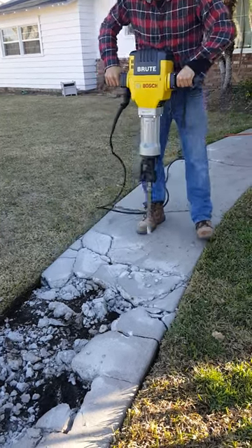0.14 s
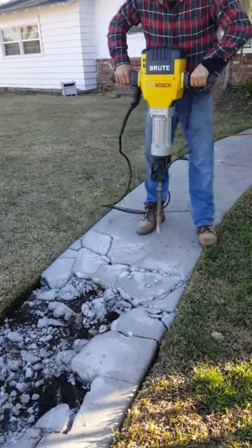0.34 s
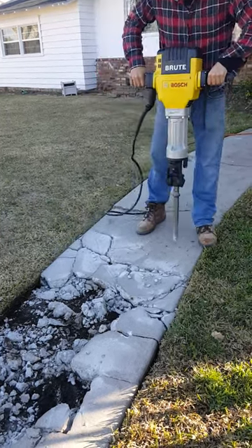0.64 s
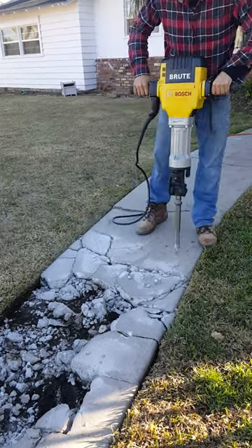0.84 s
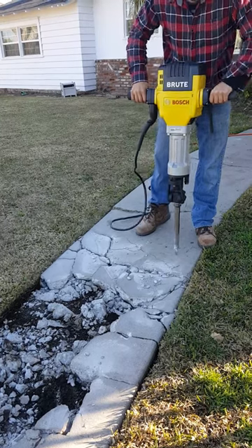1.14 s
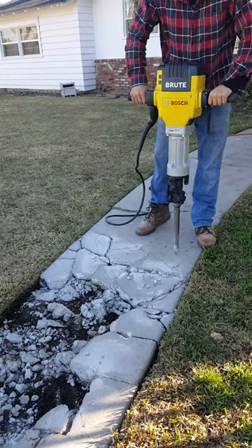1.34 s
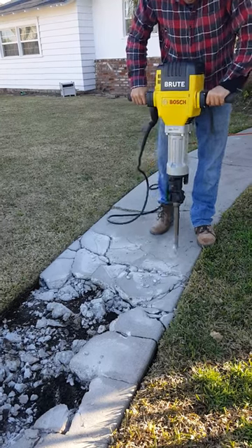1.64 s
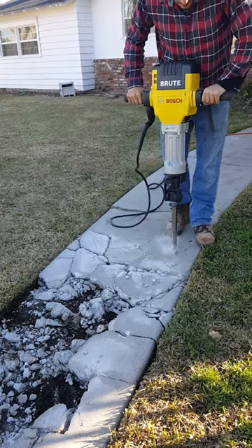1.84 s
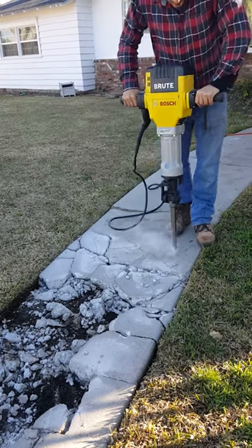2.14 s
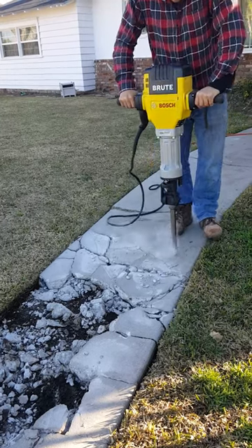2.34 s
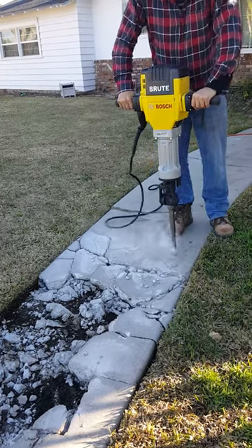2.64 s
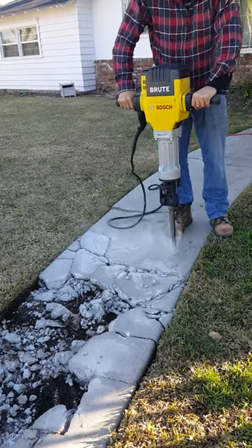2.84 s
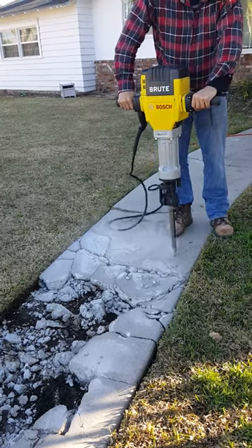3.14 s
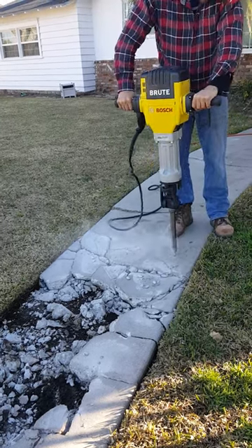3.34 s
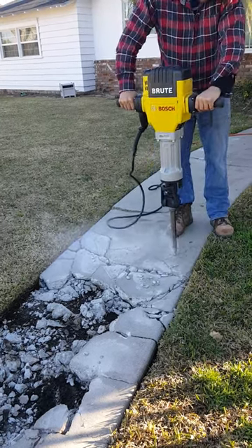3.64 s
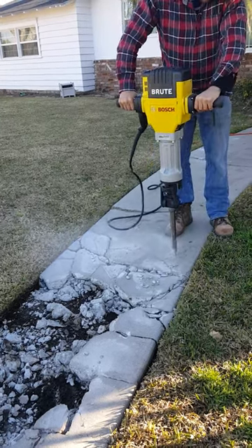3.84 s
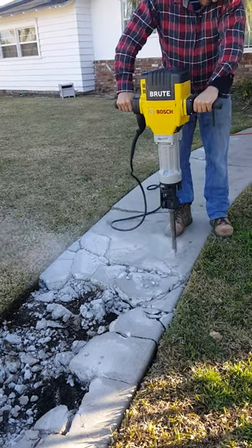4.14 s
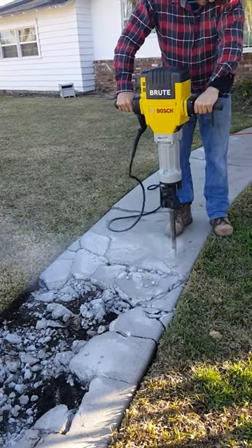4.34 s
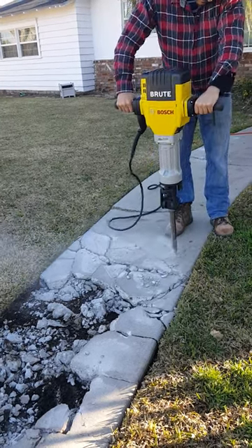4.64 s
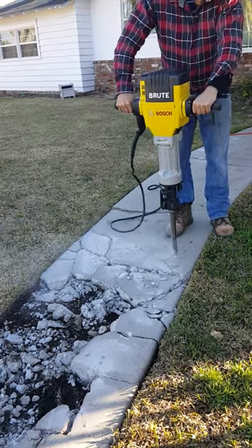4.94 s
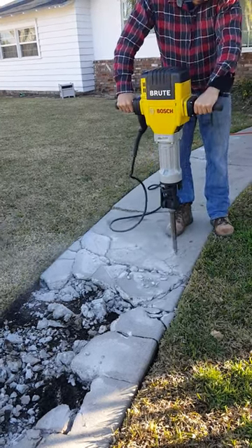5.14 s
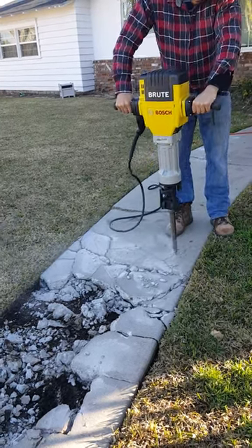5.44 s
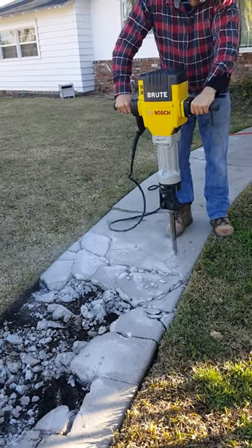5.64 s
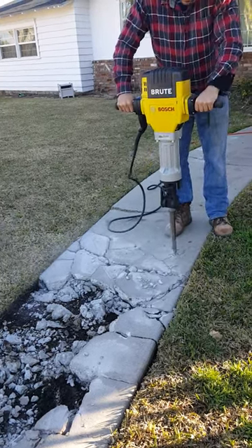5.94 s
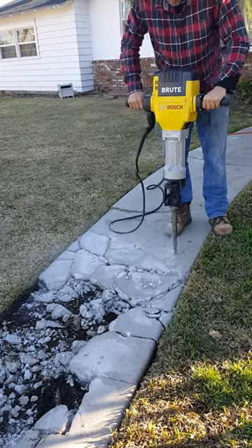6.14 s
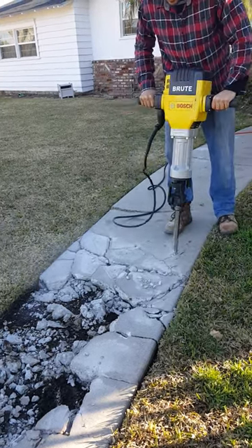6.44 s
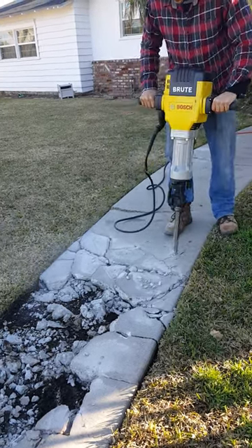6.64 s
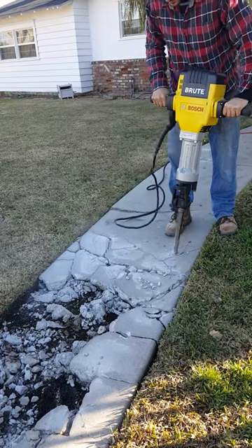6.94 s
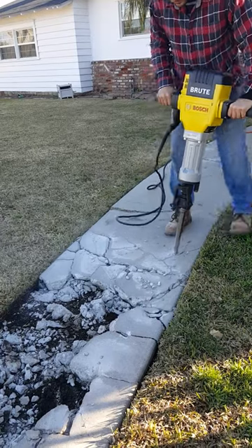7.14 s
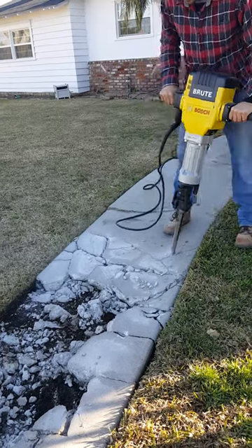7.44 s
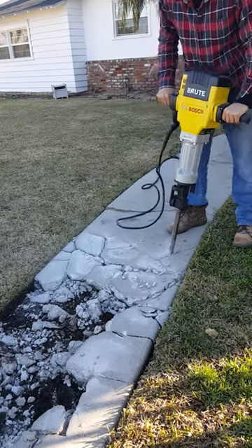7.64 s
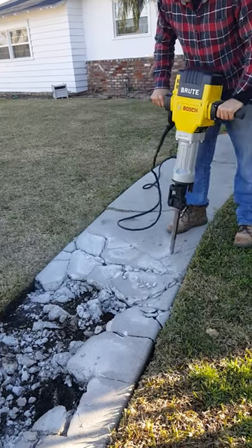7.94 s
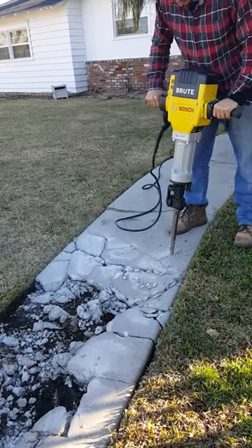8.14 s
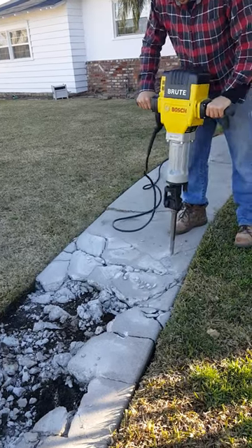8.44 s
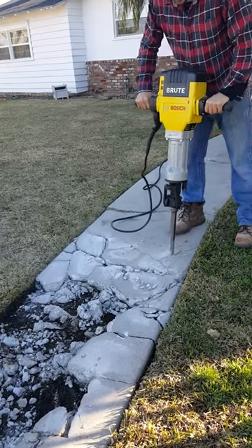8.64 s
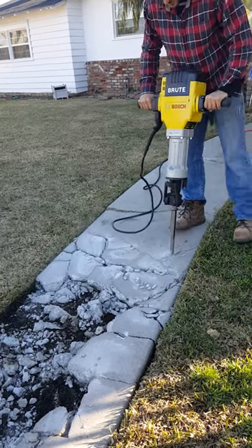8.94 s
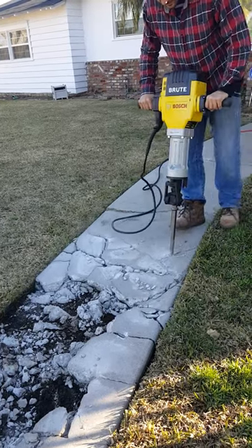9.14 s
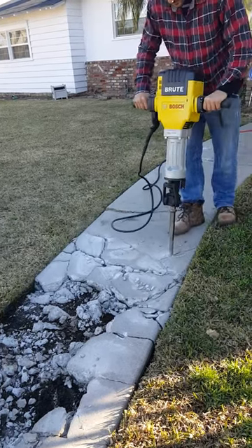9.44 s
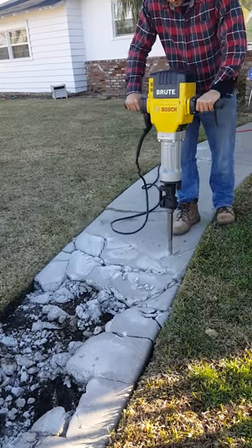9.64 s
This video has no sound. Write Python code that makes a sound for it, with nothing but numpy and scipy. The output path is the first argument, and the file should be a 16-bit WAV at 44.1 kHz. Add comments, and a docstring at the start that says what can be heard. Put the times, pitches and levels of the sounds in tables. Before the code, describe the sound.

An electric jackhammer, heard from nearby outdoors, strikes concrete once right at the start. Its motor then coasts down with a falling, pulsing whir and stops by about 0.7 seconds. Around 1 second there are a few soft knocks as the tool is set down, and faint distant traffic swells slightly. At 1.4 seconds the motor spins up with a quick rising whine, and from 1.6 seconds the hammer pounds steadily at about twelve blows a second. Each blow is a thud in the slab with a sharp, gritty crack and a bright ring from the steel chisel, over whining gears and a whirring fan. The tip scrapes a little more between 5 and 6 seconds. From about 6.4 seconds the blows vary more in strength and ring less, continuing until the end near 10 seconds. A nearby wall adds a short, dull echo.

```python
"""A concrete path by a house wall, distant traffic behind. An electric breaker strikes once, coasts to
a stop, is set down, then spins up and hammers about twelve blows a second. Each blow thuds in the slab
and cracks at the tip; the steel chisel jumps, rings freely and is damped when it lands. The gears whine
as the piston loads them, and the wall throws each blow back to a pair of microphone ports."""
import sys
import numpy as np
from scipy import signal
from scipy.fft import rfft, irfft, next_fast_len
from scipy.io import wavfile
from scipy.ndimage import uniform_filter1d

SR = 44100
rng = np.random.default_rng(int(sys.argv[2]) if len(sys.argv) > 2 else 0)


def store_pcm(level_fs):
    """Save levels as 16-bit WAV."""
    pcm = np.round(np.clip(level_fs, -1, 1) * 32767).astype(np.int16)
    wavfile.write(sys.argv[1], SR, np.atleast_2d(pcm).T)


N = 432180
N_FFT = next_fast_len(N + 4096, True)


def gain(db):
    """dB to amplitude."""
    return np.exp(np.asarray(db) * (np.log(10) / 20))


def unit_rms(x):
    """Scale to rms 1."""
    return x / np.sqrt(np.mean(x ** 2) + 1e-20)


def spectrum_db(points, hz):
    """Level at hz, interpolated over log frequency."""
    f, db = np.transpose(points)
    return np.interp(np.log(hz + 1), np.log(f + 1), db)


def columns_at(rows, t):
    """Table columns interpolated at times t."""
    times, *columns = np.transpose(rows)
    return [np.interp(t, times, c) for c in columns]


def add(mix, start_s, sound):
    """Mix in at start_s."""
    part = mix[..., round(start_s * SR):][..., :sound.shape[-1]]
    part += sound[..., :part.shape[-1]]


def noise(spectrum, corr):
    """Coloured stereo noise, channel correlation corr."""
    hz = np.fft.rfftfreq(N_FFT, 1 / SR)
    a, b = rfft(rng.standard_normal((2, N_FFT))) * gain(spectrum_db(spectrum, hz))
    right = corr * a + np.sqrt(1 - corr ** 2) * b
    return unit_rms(irfft(np.array([a, right]))[:, :N])


def narrowband(hz, width_hz):
    """Tone of wandering amplitude and phase; hz may be a curve."""
    knots = np.arange(0, N + SR, SR / width_hz)
    re, im = (np.interp(np.arange(N), knots, v) for v in rng.standard_normal((2, len(knots))))
    phase = 2 * np.pi * np.cumsum(np.broadcast_to(hz, N) / SR)
    return unit_rms(re * np.cos(phase) + im * np.sin(phase))


# Traffic spectrum: f/Hz, density/dB
TRAFFIC = [(25, 0), (110, 6.5), (300, -9.5), (1080, -13.5), (9000, -47)]


def street(t):
    """Far traffic swells once and eases off; a low drone joins late."""
    drone = gain(-48) * np.clip((t - 6.7) / .25, 0, 1) * narrowband(73.5, width_hz=16)
    swell_db = np.interp(t, [.79, .96, 2.2], [0, 11.3, 4])
    return gain(-57.5 + swell_db) * noise(TRAFFIC, corr=.89) + drone


def yard(x):
    """Dull mono wall echo and a short scattered stereo tail."""
    t = np.arange(SR // 5) / SR
    taps = rng.standard_normal((2, len(t))) * (rng.random((2, len(t))) < .05) * gain(-60 * t / .21)
    taps *= gain(-14) / np.linalg.norm(taps[0])
    echo = np.zeros(N)
    add(echo, start_s=.033, sound=gain(-13.5) * signal.lfilter([.25], [1, -.75], x))
    return echo, signal.oaconvolve(x[None], taps, axes=1)[:, :N]


# Left port's phase lead: f/Hz, phase/rad
PORT_LEAD = [(0, 0), (1460, -.3), (2840, 2.9), (4910, 7.7), (6890, 15), (9470, 21), (12200, 28),
             (15500, 31)]
# Left over right: f/Hz, level/dB
PORT_BALANCE = [(60, 5.5), (180, -0.5), (550, 0.5), (1650, 0.5), (2900, 2), (4300, -4.5), (5600, -5.5),
                (7500, 5.5), (10000, -2), (15000, -6.5)]


def ports(x):
    """The left port hears the tool first; the housing shades each side."""
    hz = np.fft.rfftfreq(N_FFT, 1 / SR)
    shade = gain(spectrum_db(PORT_BALANCE, hz) / 2)
    lag = np.exp(-1j * np.interp(hz, *np.transpose(PORT_LEAD)))
    return irfft(rfft(x, N_FFT) * [shade, lag / shade])[:, :N]


SWITCH_ON_S, SPIN_UP_S, STOP_S = 1.389, .14, .7


def drive(t):
    """The motor coasts, stops and races up; its sound ducks once the hammering starts."""
    on, on_s = t > SWITCH_ON_S, np.maximum(t - SWITCH_ON_S, 0)
    spin_up = 1 - .9 * np.exp(-on_s / SPIN_UP_S)
    working = np.clip((t - BLOWS[1][0]) / .12, 0, 1)
    duck_db = 15.5 * working  # recorder gain drops
    catch = np.clip(on_s / .04, .2, 1)
    driven = gain(-20.5 - duck_db - 15 * (1 - spin_up) ** 2) * catch
    coasting = gain(-30.5 - 54 * t) * np.clip((STOP_S - t) / .05, 0, 1)
    return np.where(on, spin_up, 1.22 - .65 * t), np.where(on, driven, coasting), working


# Fan and brush spectrum: f/Hz, density/dB
FAN = [(60, -35), (580, -8), (920, -9), (1500, -8), (2230, -9), (2850, -13.5), (3200, -13.5), (3750, -15.5),
       (4600, -9), (11200, -19.5), (14500, -25.5), (14900, -59.5)]


def fan(on, speed):
    """Fan and brushes whirr: dull while coasting, hissier with speed once on."""
    whirr = noise(FAN, corr=.031)
    low = signal.lfilter(*signal.butter(2, 3000, fs=SR), whirr)
    return low + (whirr - low) * gain(np.where(on, -17 * (1 - speed), -9.5))


# Housing tones: f/Hz
HOUSING_HZ = [568, 1470, 3150]
# Per tone: level/dB, width/Hz
HOUSING_TONES = [(-4.5, 30), (-15, 70), (-15, 200)]


def housing(t, cycle):
    """Three humming tones; each blow kicks the outer two, harder as the tip beds in."""
    low, mid, high = (gain(db) * narrowband(hz, width_hz)
                      for hz, (db, width_hz) in zip(HOUSING_HZ, HOUSING_TONES))
    bedding_db = columns_at(SEATING, t)[2]
    return gain(4.5 - 14.5 * cycle + bedding_db) * (low + high) + mid


# Tooth mesh at unit speed: f/Hz
MESH_HZ = [1500, 2250, 4500, 7500]
# Per tone: loaded level/dB, free level/dB
MESH_LEVELS = [(-16, -7.5), (-11.5, -18), (-13, -7), (-16, -25)]


def gears(t, on, speed, cycle):
    """The gears slow and whine while the piston squeezes its air cushion, late in each cycle."""
    until_work_s = BLOWS[1][0] - t
    free = until_work_s > 0
    squeeze = np.clip((cycle - .6) / .4, 0, 1)
    first_squeeze = np.clip(1 - until_work_s / .03, 0, 1) * free
    wobble = unit_rms(uniform_filter1d(rng.standard_normal(N), 300)) * ~on
    pitch = speed * (1.08 - .135 * (squeeze + first_squeeze)) * (1 + .05 * wobble)
    loaded = gain(-11 + 16 * np.sin(np.pi * squeeze ** 1.1) ** .5) * ~free
    racing = gain(-5 * ~on) * free * speed ** 2
    return sum((gain(loaded_db) * loaded + gain(free_db) * racing) * narrowband(hz * pitch, .025 * hz)
               for hz, (loaded_db, free_db) in zip(MESH_HZ, MESH_LEVELS))


def motor(t):
    """Gears, housing and fan; the piston keeps pumping as the motor coasts."""
    speed, level, working = drive(t)
    on = t > SWITCH_ON_S
    blows_s = np.array(BLOWS)[1:, 0]
    cycle = np.interp(t, blows_s, np.arange(len(blows_s))) % 1
    pumping = gain(2.7 * np.sin(2 * np.pi * np.cumsum(12 * speed) / SR) * ~on)
    return level * pumping * (gears(t, on, speed, cycle) + working * housing(t, cycle) + fan(on, speed))


def grit_burst(db, t60_s):
    """Envelope of a spray of grit."""
    t = np.arange(round(t60_s * SR)) / SR
    return gain(db - 60 * t / t60_s) * np.minimum(t / .00036, 1)


# Grit spectrum: f/Hz, density/dB
GRIT_SPECTRUM = [(100, -24), (300, 0.5), (450, 6), (650, 2), (920, -4), (1480, -4), (2250, -4.5),
                 (2850, -7), (3200, -1), (3800, -11), (5000, -5.5), (6500, -12.5), (14500, -19),
                 (14900, -47.5)]


def grit_noise():
    """Lumpy noise of crunching concrete."""
    lumps = gain(2.25 * unit_rms(uniform_filter1d(rng.standard_normal(N), 60)))
    return unit_rms(noise(GRIT_SPECTRUM, corr=.33) * lumps)


# Slab modes: f/Hz, level/dB, t60/s
SLAB_MODES = [(201, -12, 0.038), (263, -5, 0.02), (593.3, -5, 0.041), (744, -17.5, 0.035),
              (1096, -6, 0.026), (1461, -20, 0.064)]


def slab_thud(db, spread=.028, rise_s=.00072, snap_gain=1):
    """A sharp pull of air as the tip drives down, then the slab's short ring, sagging in pitch."""
    t = np.arange(1400) / SR
    hz, mode_db, t60_s = np.transpose(SLAB_MODES)[:, :, None]
    detune, strength = rng.standard_normal((2, len(hz), 1))
    sagged_t = t + .07 * .006 * (1 - np.exp(-t / .006))
    envelope = gain(mode_db + .65 * strength - 60 * t / t60_s) * (1 - np.exp(-t / rise_s))
    ring = -np.sin(2 * np.pi * hz * (1 + spread * detune) * sagged_t) * envelope
    snap = -.95 * np.exp(-((t - .0006) / .00028) ** 2)
    return gain(db) * (.58 * ring.sum(0) + snap_gain * snap)


# Chisel modes, by family: f/Hz
MODE_HZ = [3130, 4235, 4887, 5035, 5110, 7050, 7176, 9443, 9626, 12020, 13990, 14600, 5550, 10880]
# Modes per family: main bending, stiffer plane, upper bending, lengthwise
FAMILY_SIZES = [3, 2, 7, 2]
# Per mode: ring level/dB, crack level/dB, free t60/s
CHISEL_MODES = [(-6.5, -17, 0.17), (-21, -13.5, .1), (-0.5, 4.5, 0.13), (-2.5, -1, 0.28), (-11, 4, 0.26),
                (-4, -13.5, 0.25), (-2, -19.5, 0.53), (-10.5, -29.5, 0.7), (-16, -23, 0.33),
                (-7, -25.5, 0.67), (-23, -17, 0.25), (-23, -29.5, 0.141), (4.5, -1, 0.93),
                (-4.5, -16, 0.62)]


def chisel(crack_db, ring_db, lift_s, land_s, shake=1):
    """Steel modes: choked by the concrete at the blow, free from lift-off, damped on landing."""
    t = np.arange(round((land_s + .045) * SR)) / SR
    hz = np.array(MODE_HZ)[:, None]
    free_db, hit_db, t60_s = np.transpose(CHISEL_MODES)[:, :, None]
    detune, strength, phase, smear, port_phase = rng.standard_normal((5, len(hz), 1))
    axial = np.arange(len(hz))[:, None] >= len(hz) - FAMILY_SIZES[-1]

    rise = np.clip((t - lift_s * np.where(axial, .2, 1)) / np.where(axial, .006, .0015), 0, 1)
    landed_s = np.maximum(t - land_s, 0)
    damping_db = np.where(axial, 10.5, 18) * np.minimum(landed_s / .0029, 1) + 60 * landed_s / 4.2
    decay_db = 60 * (t - land_s / 2) / t60_s + damping_db
    knots = np.linspace(0, t[-1], 2 + round(t[-1] * 260))
    depth_db = shake * np.select([hz < 4500, axial, hz > 5000], [5, 4, 3], 1.5)
    chatter_db = depth_db * [np.interp(t, knots, v) for v in rng.standard_normal((len(hz), len(knots)))]
    aim_db = 2 * shake * strength * (free_db < -3.2)  # weak modes depend on how squarely the blow falls
    envelope = rise * gain(free_db + ring_db[:, None] + aim_db + chatter_db - decay_db)

    spread = shake * np.select([hz < 4500, axial], [.012, .0025], .002)  # low modes shift with the grip
    stiff_plane = (hz > 5000) & (hz < 5200)
    glide_s = .035 * .008 * (1 - np.exp(-t / .008)) * stiff_plane  # starts sharp while gripped
    modes = envelope * np.exp(2j * np.pi * (hz * ((1 + spread * detune) * t + glide_s) + phase))

    crack_t = t[:900]
    choked = gain(crack_db + hit_db - 7.5 - 60 * crack_t / .022) * np.minimum(crack_t / .00045, 1)
    modes[:, :900] += choked * np.exp(2j * np.pi * (hz * (1 + .016 * smear) * crack_t + phase))
    to_ports = np.exp(.55j * shake * port_phase.T * [[1], [-1]])  # long rod: own phase at each port
    fade = np.linspace(3, 0, len(t)).clip(0, 1)
    return (to_ports @ modes).real * fade


# Chisel seating: t/s, lift-off/ms, landing/ms, thud re blow/dB, rattle re blow/dB,
# lengthwise ring/dB, its overtone/dB, upper bending/dB, stiffer re main plane/dB
SEATING = [(0.1, 5, 120, -8.5, -19.5, -26, -38, 10, -14.5), (1.6, 1, 27.4, -4, -4, -20, -22, -6, -22.5),
           (1.9, 1, 21.6, -7.5, -5, -34.5, -23.5, -3.5, -32),
           (3.05, 0.5, 21, -2.5, -12, -24, -26.5, -14, -31), (3.25, 8, 33, 0, -15, -22, -28, -13, 4),
           (4.5, 9.5, 43.2, -0.5, -7, -33, -28, -19, 10), (5.15, 12.5, 42, -2, -27, -33, -29, -11, 8),
           (5.5, 13, 45, -1.5, -17, -29, -26.5, -9, 4), (6.15, 18, 36, -2, -31, -32.5, -28.5, -20, 11),
           (6.35, 9, 22, -3, -26, -38, -30.5, 3, 5), (7.5, 3.5, 26, -0.5, -5, -38, -38, -26, 21),
           (8.95, 3, 16, -0.5, -8, -32.5, -40, 13, 16), (9.15, 0, 36, 4.5, -4, -33.5, -26, 8, 8),
           (9.8, 1, 24, -1, -7, -40, -23.5, -5, 12)]


def strike(slab, steel, grit, start_s, blow_db, bend_db):
    """Mix in one blow; the seating sets the chisel's jump and the balance of its modes."""
    lift_ms, land_ms, *levels = columns_at(SEATING, start_s)
    thud_db, rattle_db, axial_db, overtone_db, upper_db, tilt_db = levels
    land_ms += 3 * np.tanh(rng.standard_normal())
    excess_db = bend_db + 22  # over the usual ring
    axial_db += .32 * excess_db
    upper_db += (bend_db + blow_db) / 2 - 13
    main_db = bend_db - 10 * np.log10(1 + gain(2 * tilt_db))  # two planes share the ring
    ring_db = np.repeat([main_db, main_db + tilt_db, upper_db, axial_db], FAMILY_SIZES)
    ring_db[0] = min(blow_db + thud_db - 14, axial_db + .5)  # rings as the tip beds in
    ring_db[11] = main_db - 3.5  # highest mode bends in the main plane
    ring_db[-1] = overtone_db
    shake = 1
    if start_s < SWITCH_ON_S:  # clear of the concrete: two upper modes sing, the rod barely shakes
        ring_db[[7, 9]] += [19, 5]
        shake = .25
    add(steel, start_s, chisel(blow_db + .12 * excess_db, ring_db, lift_ms / 1000, land_ms / 1000, shake))
    add(slab, start_s, slab_thud(blow_db + thud_db))
    add(grit, start_s, grit_burst(blow_db - 9.5, t60_s=.032))
    add(grit, start_s, grit_burst(blow_db + rattle_db - 18.5, t60_s=.2))  # chisel rattles in its holder


# Piston blows: t/s, level/dB, bending ring/dB
BLOWS = [(0.022, 0.5, -42), (1.607, -4.5, -17), (1.6994, -5.5, -7.5), (1.7861, -6, -4.5), (1.8707, -7, -8),
         (1.9537, -5.5, -6), (2.0366, -7, -9), (2.119, -7.5, -15.5), (2.2005, -8.5, -8.5),
         (2.279, -8, -9.5), (2.3621, -6.5, -7.5), (2.4449, -9.5, -17), (2.526, -5, -10), (2.606, -6, -37),
         (2.6861, -5.5, -12), (2.7663, -5, -19), (2.849, -5.5, -15.5), (2.9305, -7, -16.5),
         (3.0109, -14, -26), (3.0923, -9, -11), (3.1742, -6, -10.5), (3.256, -8.5, -19.5),
         (3.3384, -7.5, -14.5), (3.4182, -8.5, -18.5), (3.4983, -10.5, -38), (3.5793, -7.5, -20),
         (3.6599, -8, -29), (3.739, -5, -22), (3.819, -4.5, -17), (3.8995, -6, -20), (3.9791, -5, -22),
         (4.0596, -4.5, -17), (4.1393, -11.5, -22), (4.2189, -4, -29), (4.2985, -5.5, -15.5),
         (4.378, -5, -24), (4.4586, -6.5, -23.5), (4.5381, -5, -22.5), (4.6178, -10.5, -15),
         (4.698, -10.5, -16.5), (4.7777, -9.5, -15.5), (4.8581, -9.5, -13.5), (4.9378, -10, -22),
         (5.0167, -10, -18.5), (5.0977, -9, -20.5), (5.177, -9, -15), (5.2567, -7, -16.5),
         (5.337, -8, -16.5), (5.417, -6, -14), (5.4968, -7, -13.5), (5.5756, -6, -13.5),
         (5.6567, -6.5, -13.5), (5.7365, -5.5, -14), (5.8172, -2.5, -23), (5.8965, -6, -20),
         (5.9757, -7.5, -23), (6.0556, -6, -15.5), (6.1359, -5, -20), (6.216, -7.5, -23), (6.296, -8, -17),
         (6.3763, -7.5, -37), (6.4577, -9, -56), (6.5395, -12, -47), (6.6216, -8, -13.5),
         (6.7029, -5.5, -32), (6.7839, -5, -13), (6.8651, -8, -29), (6.9471, -9, -33), (7.029, -12.5, -48),
         (7.1136, -16.5, -40), (7.1939, -5, -35), (7.2769, -6.5, -18), (7.3579, -12.5, -33),
         (7.44, -4, -25), (7.5251, -6.5, -20), (7.6045, -12.5, -26), (7.6839, -16, -44),
         (7.7638, -8.5, -35), (7.8452, -6.5, -17), (7.9281, -6.5, -18), (8.009, -7.5, -25),
         (8.0905, -7, -27), (8.173, -7, -26), (8.2534, -10, -27), (8.336, -8, -24), (8.417, -12, -39),
         (8.4998, -14.5, -29.5), (8.5819, -14.5, -49), (8.6636, -6.5, -36), (8.7453, -6, -32),
         (8.8274, -5.5, -30.5), (8.9102, -5.5, -54), (8.992, -15, -32), (9.0735, -9.5, -46),
         (9.155, -9.5, -44), (9.2359, -11, -29), (9.316, -10, -28), (9.3946, -10, -21), (9.4751, -8.5, -16),
         (9.554, -9, -20), (9.634, -9, -20), (9.714, -6, -19.5), (9.7934, -7.5, -14)]
# Softer thuds and grit between blows (wall echoes, tip bounces): t/s, thud/dB, grit/dB
SOFT_THUDS = [(1.625, -6, -17.5), (1.652, -22.3, -22), (1.729, -33, -22.5), (2.232, -20, -23.5),
              (2.31, -18, -26), (2.391, -25, -21.3), (2.718, -19, -23), (2.88, -5, -25), (3.046, -7, -23),
              (3.209, -8, -26), (3.295, -9, -24), (3.378, -7, -28), (3.459, -18, -23), (3.542, -14, -24),
              (3.604, -29, -36), (3.621, -24, -25), (3.676, -30, -18), (3.78, -11, -34),
              (3.862, -3.5, -23.5), (4.103, -6.5, -29), (4.33, -29, -24), (4.397, -28.6, -26),
              (4.562, -25, -31), (4.98, -11.5, -31), (5.22, -9, -25), (5.297, -13, -25.8),
              (5.312, -28, -31), (5.371, -21, -29), (5.531, -11, -32), (5.548, -18, -29), (5.607, -15, -22),
              (5.688, -21, -24), (5.703, -16, -24), (5.771, -17.5, -23), (5.782, -6, -22),
              (5.847, -21.2, -32), (5.862, -27, -35), (6.01, -15, -25), (6.087, -26, -21),
              (6.176, -11, -23.6), (6.248, -23, -27), (6.481, -11, -37), (6.571, -13, -33),
              (6.652, -28, -34), (6.738, -28, -41), (6.973, -16, -28), (7.137, -13, -29), (7.389, -11, -22),
              (7.473, -11, -27), (7.545, -25.0, -23), (7.707, -11, -36), (7.868, -15, -35),
              (8.682, -17, -35), (8.849, -23, -30), (9.023, -10, -28), (9.267, -24, -26.5),
              (9.746, -24, -29)]
# Tip scraping in its hole: t/s, level/dB
SCRAPE = [(1.6, -49.5), (4.5, -44.5), (5.15, -40), (5.3, -32), (5.85, -34), (6.2, -44), (9.8, -45)]
# Knocks of the idle tool, the last one the click of its trigger: t/s, thud/dB, crack/dB
IDLE_KNOCKS = [(0.126, -41.5, -29.5), (0.193, -49, -36.5), (0.233, -42, -50), (0.934, -20.5, -49.5),
               (0.957, -26, -52), (1.034, -19, -32), (1.084, -26.5, -49), (1.267, -47, -59),
               (1.389, -47, -37)]


def hammering(t):
    """Blows, softer thuds between them, scraping and knocks: slab, steel and grit."""
    slab, grit, steel = np.zeros(N), np.zeros(N), np.zeros((2, N))
    for blow in BLOWS:
        strike(slab, steel, grit, *blow)
    for start_s, thud_db, grit_db in SOFT_THUDS:
        add(slab, start_s, slab_thud(thud_db - 1.5, spread=.062, rise_s=.0028, snap_gain=.3))
        add(grit, start_s, grit_burst(grit_db + 2, t60_s=.035))
    grit += gain(columns_at(SCRAPE, t)[0]) * (t > BLOWS[1][0])
    for start_s, thud_db, crack_db in IDLE_KNOCKS:
        ring_db = crack_db - np.repeat([3, 10, 18, 18], FAMILY_SIZES)
        add(steel, start_s, chisel(crack_db, ring_db, lift_s=0, land_s=.02))
        add(slab, start_s, slab_thud(thud_db))
        add(grit, start_s, grit_burst(crack_db - 1, t60_s=.14))
    low_cut = signal.butter(3, 125, "high", fs=SR, output="sos")  # too small to radiate deep bass
    return signal.sosfilt(low_cut, slab + grit * grit_noise()) + steel


def scene():
    """Breaker, yard echoes and street."""
    t = np.arange(N) / SR
    tool = hammering(t) + motor(t)
    echo, tail = yard(tool.mean(0))
    return ports(tool + echo) + tail + street(t)


def record(dry):
    """Clip peaks, then low-pass at 15.8 kHz."""
    low_pass = signal.firwin(401, 15800, window=("kaiser", 9), fs=SR)
    return signal.oaconvolve(np.clip(dry, -1, 1), low_pass[None], "same")


dry = scene()
out = record(dry)
store_pcm(out)
```